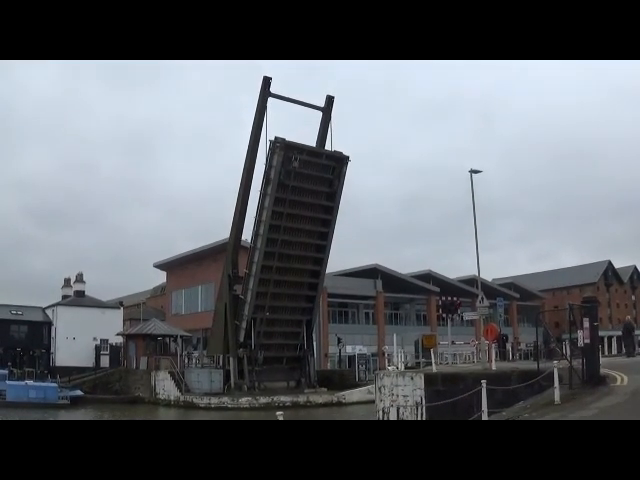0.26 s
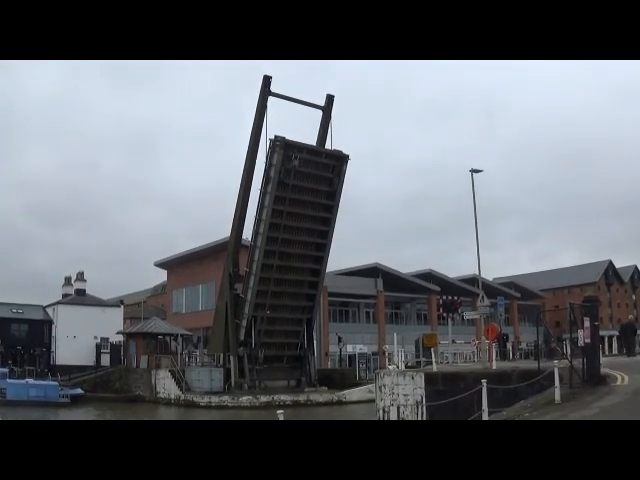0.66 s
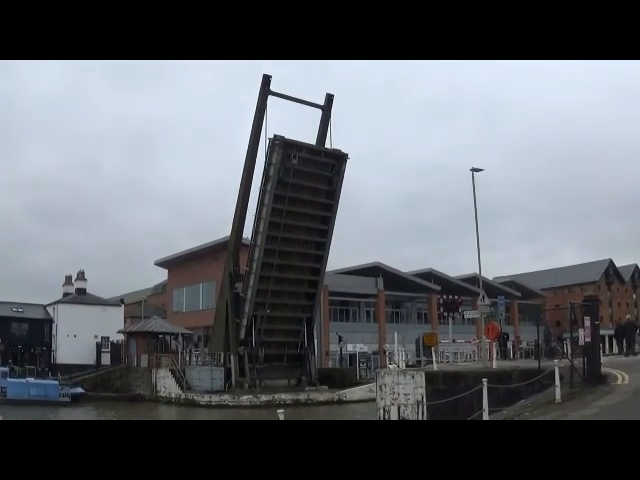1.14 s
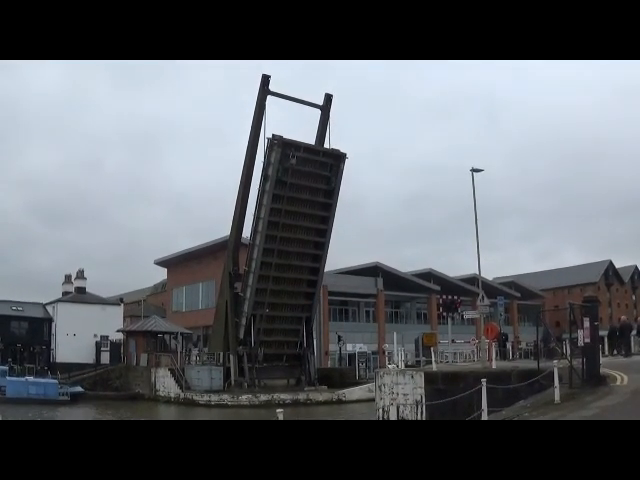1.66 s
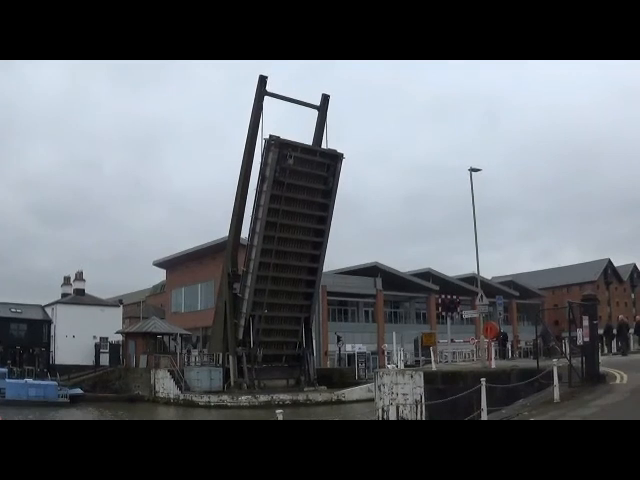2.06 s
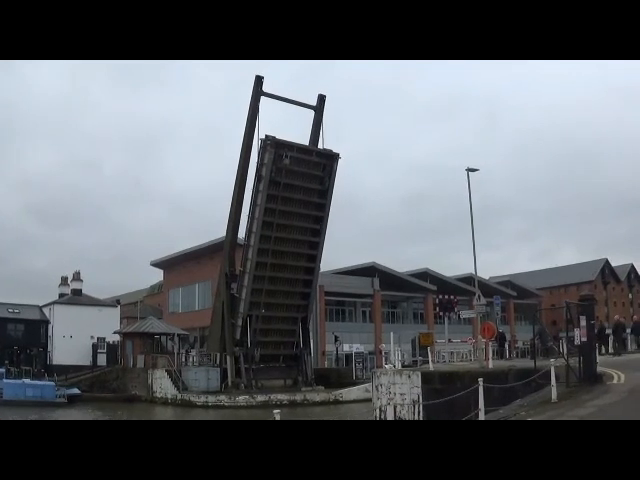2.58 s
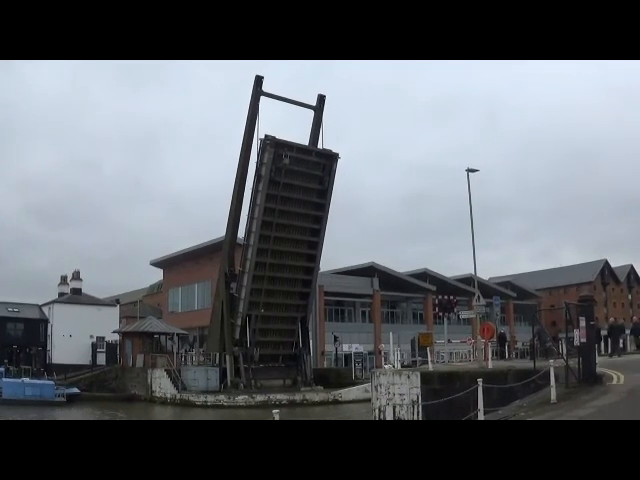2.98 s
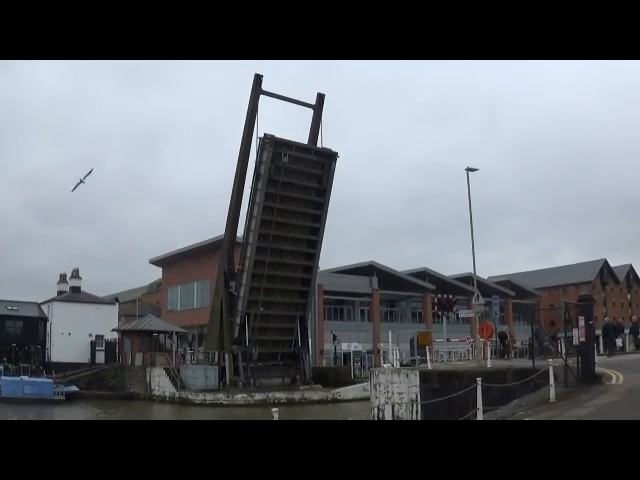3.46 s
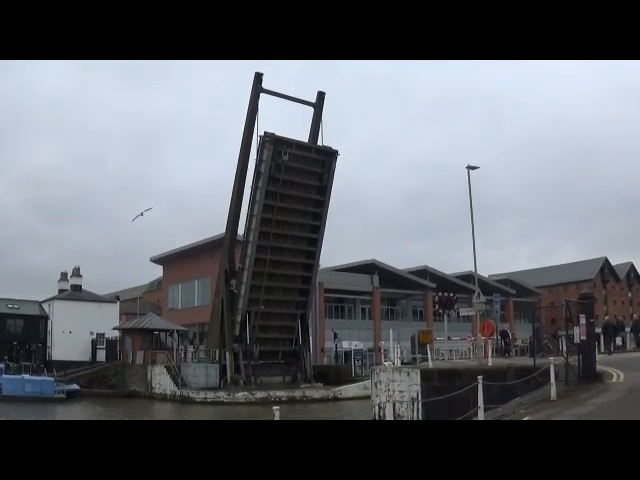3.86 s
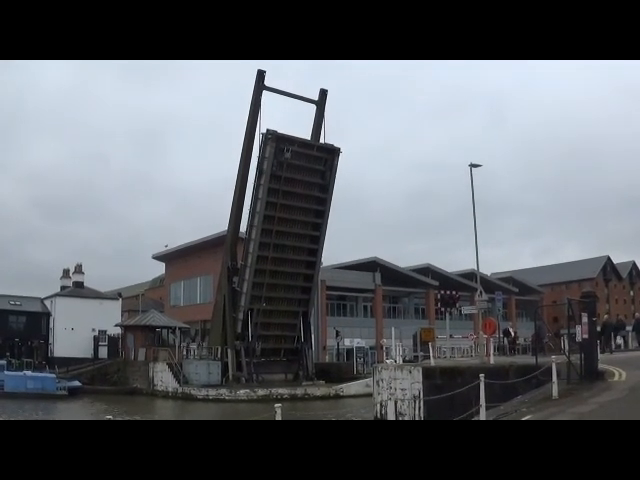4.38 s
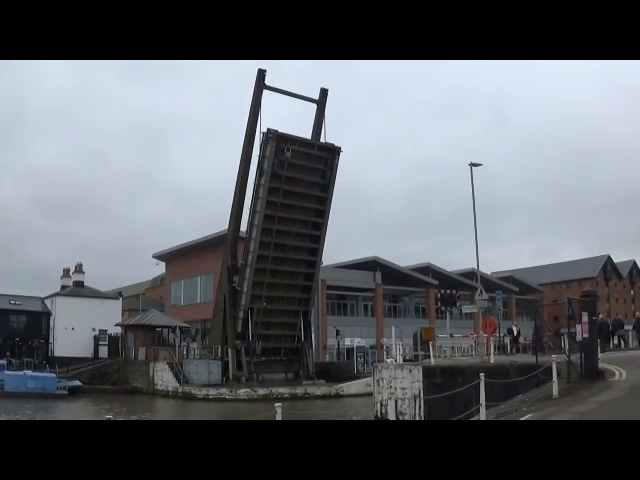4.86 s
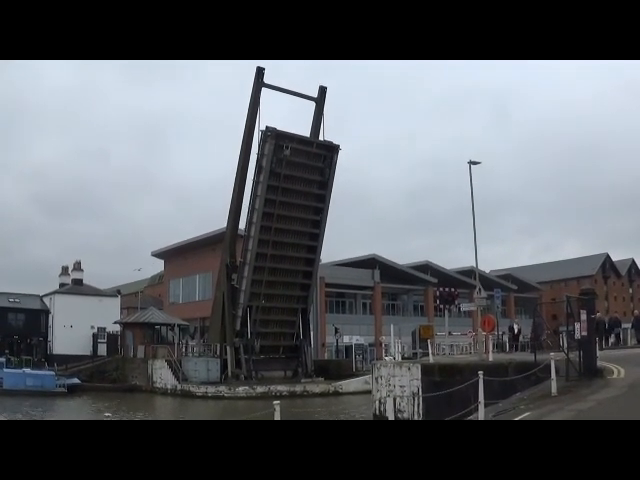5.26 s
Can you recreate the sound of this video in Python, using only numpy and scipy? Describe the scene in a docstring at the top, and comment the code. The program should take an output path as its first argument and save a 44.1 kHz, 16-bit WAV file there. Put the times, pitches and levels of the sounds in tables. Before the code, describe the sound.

A smooth machine hum dominates over four seconds, with hissing fluid ringing in pipes that gradually quietens. A faraway vehicle pulls off as a very low drone. A clattering steel clunk cuts the hum, followed by trembling, a short dry creak, then rough deep rumble, rattling plates and heavy thumps beneath a wavering brake squeal. Wide stereo pickup in an open waterside space, diffuse reflections from buildings, quiet traffic wash.

```python
"""Beside a dock a steel lifting bridge is raised; the hydraulic pump's periodic pulses sum to a hum and whine.
Oil is shaped noise: it hisses, rings in the pipes and whistles at a valve that closes as the deck slows.
The drive stops with a clunk, decaying bursts of noise that come back from the buildings as a diffuse tail.
The deck then shudders and rumbles, a pivot creaks, and a brake squeals on close, beating disc modes.
An engine idles and a vehicle pulls away some way off, as harmonic tones under the noise of the town."""
import sys
import numpy as np
from scipy import signal
from scipy.fft import rfft, irfft, next_fast_len
from scipy.io import wavfile

SR = 44100
rng = np.random.default_rng(int(sys.argv[2]) if len(sys.argv) > 2 else 0)


def wrap_up_sound(samples):
    """Save the sound to the file named by the first command line argument, as 16-bit audio."""
    columns = np.atleast_2d(samples).T
    # keep every value between -1 and 1, then stretch to whole-number steps
    tamed = np.clip(columns, -1, 1)
    steps = np.round(tamed * 32767).astype(np.int16)
    wavfile.write(sys.argv[1], SR, steps)


N = 243852
T = np.arange(N) / SR  # time in seconds

# Levels within a spectrum or a set of modes are relative.
# A mode's width is the offset from its centre at which the amplitude is a third of the peak.

# Harmonics of the pump's hum. Each row: multiple of the piston rate, level in dB.
HUM_HARMONICS = [(1 / 2, -24.5), (1, 0), (3 / 2, -26), (2, -24.5), (5 / 2, -32)]
# Harmonics of the pump's whine. Each row: multiple of the piston rate, relative level in dB.
WHINE_HARMONICS = [(9, -11), (10, 0), (11, -10), (14, -10)]
# Spectrum of the oil's turbulent hiss. Each row: frequency in Hz, level in dB.
OIL_SPECTRUM = [(900, -3), (2200, -5.5), (3400, -5.5), (4000, -13), (4900, -13.5), (6400, -14),
                (7600, -11.5), (9000, -16), (11000, -18)]
# Modes the oil rings in the pipes. Each row: centre in Hz, width in Hz, level in dB.
PIPE_MODES = [(1210, 46, 3), (1846, 82, 3.5), (2300, 120, -2), (3147, 260, -2), (4230, 135, -6.5)]
# The valve's whistling band. Each row: centre in Hz, width in Hz, level in dB.
VALVE_MODES = [(9770, 370, 0)]
# Blows in the drive. Each row: start in seconds, clash in dB, ring in dB, thud in dB.
DRIVE_BLOWS = [(4.191, -23, -26, -21), (4.271, -30.5, -32, -19), (4.327, -39, -44, -30)]
# Spectrum of the clashing faces. Each row: frequency in Hz, level in dB.
CLASH_SPECTRUM = [(300, -1.5), (450, 6), (850, -26), (1300, -4), (2300, -6), (3500, -13), (6000, -19),
                  (8000, -17), (11000, -20)]
# Spectrum of the girders' thud. Each row: frequency in Hz, level in dB.
THUD_SPECTRUM = [(40, -34), (90, -11), (140, -2), (175, -16.5), (235, -11.5), (310, -19.5), (400, -20.5),
                 (800, -27.5)]
# Modes of the struck steel. Each row: centre in Hz, width in Hz, level in dB.
STEEL_MODES = [(621, 11.5, 17.5), (1026, 42, 5.5), (1257, 31, 1), (1800, 96, 0), (2230, 120, -6),
               (2860, 60, -4), (3050, 60, 2.5), (9960, 210, 3.5), (10120, 100, -6), (10670, 150, -5)]
# The band of the pawl's click. Each row: centre in Hz, width in Hz, level in dB.
PAWL_MODES = [(2230, 650, 0)]
# Slips of the dry pivot as it takes the load. Each row: start in seconds, level in dB.
PIVOT_SLIPS = [(4.668, -34.5), (4.693, -40.5), (4.747, -45)]
# Modes of the pivot's pin. Each row: centre in Hz, width in Hz, level in dB.
PIN_MODES = [(1370, 35, -5), (1497, 61, -0.5), (2100, 300, -18), (2920, 200, -20), (5540, 93, -19.5),
             (6950, 700, -37)]
# Spectrum of the deck's rumble. Each row: frequency in Hz, level in dB.
RUMBLE_SPECTRUM = [(22, -17), (36, -7), (62, -7), (100, 0.5), (155, 0.5), (215, -2), (270, -6),
                   (350, -10.5), (500, -20), (720, -29.5)]
# Spectrum of the deck plates' rattle. Each row: frequency in Hz, level in dB.
RATTLE_SPECTRUM = [(260, -6), (460, 2), (780, -5), (1280, -8.5), (2100, -17.5), (3100, -33), (4600, -30.5),
                   (7200, -44), (10800, -45)]
# Heavy heaves of the deck. Each row: start in seconds, pitch in Hz, level in dB.
DECK_HEAVES = [(4.832, 88.7, -11.5), (4.926, 58.4, -16.5), (5.078, 79.4, -22), (5.263, 60.5, -12),
               (5.335, 149, -17)]
# Modes of the brake disc. Each row: pitch in Hz, waver in Hz, relative level in dB, time of peak in seconds.
DISC_MODES = [(1803, 5, 0, 4.93), (1846, 6, 0, 5.18), (1873, 10, -6, 5.07)]
# Overtones of the second disc mode. Each row: multiple of its pitch, relative level in dB.
SQUEAL_OVERTONES = [(2, 6), (3, -1), (5, 0)]
# Spectrum of the brake pad's scrape. Each row: frequency in Hz, level in dB.
SCRAPE_SPECTRUM = [(2000, -14), (3600, 7), (4400, -8), (7300, -1), (8300, -15), (9200, -2), (10500, -14)]
# The pad grabs once more as it lets go: time in seconds, half length in seconds, added pressure 0-1.
LAST_PAD_GRAB = (5.303, 0.02, 0.61)
# Reverberation among the buildings. Each row: frequency in Hz, time to decay by 60 dB in seconds.
QUAY_DECAY = [(100, 0.63), (500, 0.7), (2000, 1), (10000, 0.45)]
# Harmonics of the idling engine. Each row: multiple of the firing rate, level in dB, gain in a swell in dB.
ENGINE_HARMONICS = [(1, -57, -4), (2, -49.5, 5), (3, -43.5, 7.5)]
# Swells of the engine's throb. Each row: centre in seconds, half length in seconds, strength 0-1.
ENGINE_SWELLS = [(2.27, 0.52, 1), (3.868, 0.23, 0.95)]
# Spectrum of the town's wash. Each row: frequency in Hz, level in dB.
WASH_SPECTRUM = [(240, -10), (330, -2), (500, -3), (1050, -3.5), (1500, -10), (2200, -14), (3300, -21),
                 (4600, -28)]
# Spectrum of the town's low rumble. Each row: frequency in Hz, level in dB.
TOWN_LOW_SPECTRUM = [(18, -21), (46, -7), (86, -1.5), (142, 0), (212, -3.5), (295, -6.5), (440, -19.5)]
# Left-right correlation of broad noise. Each row: frequency in Hz, correlation from -1 to 1.
CORRELATION = [(60, 0.95), (150, 0.85), (330, 0.72), (700, 0.68), (1100, 0.54), (2000, 0.72), (5000, 0.62),
               (10000, 0.89)]
# Left-right correlation of the deck's noise. Each row: frequency in Hz, correlation from -1 to 1.
DECK_CORRELATION = [(60, 0.66), (110, .5), (190, 0.55), (330, -0.21), (600, 0.11), (1100, .2), (2000, 0.56)]

# the valve starts to close, takes this long over it, and the drive stops
THROTTLE_S, CLOSING_S, STOP_S = 2.21, 1.14, 4.186
PISTON_HZ = 223.3
# the hum sags once the valve starts to close; hum and whine weaken further just before the stop
HUM_DB, HUM_SAG_DB_PER_S, RUN_DOWN_S, RUN_DOWN_DB = -26, 2.5, 0.2, 4.5
# the whine comes up as the load shifts, then sags
WHINE_DB, WHINE_RISE_DB, WHINE_SAG_DB_PER_S, LOAD_S, LOAD_RISE_S = -60.5, 6, 1, 1.8, 0.22
# the hiss with the valve open, its loss on closing, and the pipes' ring relative to it
HISS_DB, HISS_DROP_DB, PIPES_DB = -49.5, 9.5, -2.5
# the whistle grows slowly, then collapses as the valve closes
WHISTLE_DB, WHISTLE_GROWS_DB_PER_S, WHISTLE_DROP_DB, WHISTLE_COLLAPSE_S = -54.5, 1, 26, 0.41
# the deck trembles after the clunk, then breaks into a full shudder
TREMBLE_S, TREMBLE_DB, SHUDDER_S, SHUDDER_ATTACK_S = 4.37, -10.5, 4.68, 0.077
RUMBLE_DB = -22.5
# the rattle takes this share of the shudder's change in dB, holds, then settles
RATTLE_DB, RATTLE_FOLLOWS, RATTLE_HOLD_S, RATTLE_SETTLE_DB_PER_S = -37.5, 0.57, 0.47, 15
# each heave jolts the rumble and the plates
JOLT_DB, JOLT_S = 3, 0.027
# the brake pad touches, presses harder, holds and lets go
BRAKE_S, PRESS_S, GRIP_S, LET_GO_S = 4.75, 0.23, 0.22, 0.17
# squeal and harshness at full pressure, and how much weaker each is at the first touch
SQUEAL_DB, SQUEAL_RANGE_DB, HARSH_DB, HARSH_RANGE_DB = -37, 11.5, -59, 33
IDLE_HZ = 35.6  # the idling engine's firing rate
# the far vehicle speeds up evenly, comes in quickly and recedes
PULL_AWAY_S, SPEED_UP_S, DRONE_FROM_HZ, DRONE_TO_HZ = 3.4, 0.78, 36.9, 42.5
DRONE_DB, DRONE_START_S, DRONE_ATTACK_S, RECEDE_DB_PER_S = -41.5, 2.98, 0.57, 6
TOWN_DB, TOWN_LOW_DB = -43.5, -43.5
TOP_HZ = 11080  # upper band limit of the whole sound


def amp(db):
    """The level law: decibels to an amplitude ratio."""
    return np.exp(np.asarray(db) * np.log(10) / 20)


def unit(x):
    """Normalisation to an rms of 1."""
    return x / np.sqrt(np.mean(x ** 2) + 1e-20)


def along(points, hz):
    """Linear interpolation of (Hz, value) points on a logarithmic frequency axis."""
    f, v = np.transpose(points)
    return np.interp(np.log(hz + 1), np.log(f + 1), v)


def since(start):
    """Elapsed time: seconds since start, 0 before it."""
    return np.maximum(T - start, 0)


def fade_in(start, length):
    """A linear ramp from 0 to 1."""
    return np.clip((T - start) / length, 0, 1)


def swell(centre, half_length):
    """A Gaussian bump from 0 to 1 and back."""
    return np.exp(-((T - centre) / half_length) ** 2)


def struck(start, attack, t60):
    """The envelope of one blow: a quick rise under an exponential decay."""
    age = since(start)
    return (1 - np.exp(-age / attack)) * amp(-60 * age / t60)


def wobble(rate, order=6):
    """Band-limited random fluctuation: a smooth curve through rate knots a second."""
    knots = rng.standard_normal(int(N * rate / SR) + 4)
    smooth = signal.resample(knots, len(knots) * order)
    return np.interp(T * rate * order, np.arange(len(smooth)), smooth)


def cycles(hz):
    """Phase as the integral of frequency, from a random start."""
    return 2 * np.pi * (np.cumsum(hz) / SR + rng.random())


def pan(x, left_db):
    """Level difference between the ears: louder on the left by left_db."""
    return x * amp([[left_db / 2], [-left_db / 2]])


def filtered(x, response):
    """Linear filtering: the spectrum of x times a response of frequency."""
    m = next_fast_len(N + SR // 2)
    return irfft(rfft(x, m) * response(np.fft.rfftfreq(m, 1 / SR)), m)[..., :N]


def colour(points):
    """The gain of a broad spectrum, falling as the square of frequency beyond its ends."""
    def gain(hz):
        below = np.minimum(hz / points[0][0], 1) ** 2
        above = np.maximum(hz / points[-1][0], 1) ** 2
        return amp(along(points, hz)) * below / above
    return gain


def resonances(modes):
    """Superposition of resonance peaks, each with a Lorentzian gain."""
    return lambda hz: sum(amp(db) / (1 + ((hz - centre) / width) ** 2 * 2) for centre, width, db in modes)


def rush(gain, correlation=CORRELATION):
    """Coloured noise of rms 1; the balance of mid to side sets the left-right correlation."""
    def mid_and_side(hz):
        turn = np.arccos(np.clip(along(correlation, hz), -1, 1)) / 2
        return gain(hz) * [np.cos(turn), np.sin(turn)]
    mid, side = filtered(rng.standard_normal((2, N)), mid_and_side)
    return unit(np.array([mid + side, mid - side]))


def pump():
    """Periodic pulsation: pistons pulse the oil at a steady rate, giving harmonics that waver in the open air."""
    run_down_db = RUN_DOWN_DB * fade_in(STOP_S - RUN_DOWN_S, RUN_DOWN_S)
    hum_db = HUM_DB - HUM_SAG_DB_PER_S * since(THROTTLE_S) - run_down_db
    whine_db = WHINE_DB + WHINE_RISE_DB * fade_in(LOAD_S, LOAD_RISE_S)
    whine_db = whine_db - WHINE_SAG_DB_PER_S * since(THROTTLE_S) - run_down_db
    phase = cycles(PISTON_HZ + 0.21 * wobble(12))
    hum = 0
    for k, db in HUM_HARMONICS:
        waver_db = (k != 1) * 2.0 * wobble(5.06)  # the fundamental stays steady
        hum = hum + amp(db + waver_db) * np.sin(k * phase + 2 * np.pi * rng.random())
    whine = sum(amp(db + 1.1 * wobble(14)) * np.sin(k * phase) for k, db in WHINE_HARMONICS)
    left_db = 4.1 - 0.3 * T  # the hum drifts towards the centre
    sides_db = np.array([left_db, -left_db]) / 2
    stereo_hum = amp(hum_db + 0.67 * wobble(5.95) + sides_db) * hum
    running = 1 - fade_in(STOP_S - 0.06, 0.13)
    return running * (stereo_hum + pan(amp(whine_db) * whine, left_db=4))


def oil():
    """Flow noise: oil hisses, excites the pipes, whistles at the valve and spits as the pressure is dumped."""
    hiss_db = HISS_DB - HISS_DROP_DB * fade_in(THROTTLE_S, CLOSING_S)
    collapse = 1 - np.exp(-since(THROTTLE_S) / WHISTLE_COLLAPSE_S)
    whistle_db = WHISTLE_DB + WHISTLE_GROWS_DB_PER_S * np.minimum(T, THROTTLE_S) - WHISTLE_DROP_DB * collapse
    hiss = amp(hiss_db + 0.57 * wobble(10)) * rush(colour(OIL_SPECTRUM))
    pipes = amp(hiss_db + PIPES_DB + 0.74 * wobble(6.28)) * rush(resonances(PIPE_MODES))
    whistle = amp(whistle_db + 1.0 * wobble(20)) * rush(resonances(VALVE_MODES))
    spit = amp(-48.5) * struck(4.325, attack=0.0036, t60=0.44) * rush(resonances(VALVE_MODES))
    after_stop = 1 - 0.32 * fade_in(STOP_S, 0.81)
    return (hiss + pipes + whistle) * after_stop + spit


def clunk():
    """Impact: a pawl clicks; each blow clashes chattering faces, rings the steel and, slower, booms the girders."""
    click = amp(-28.0) * struck(4.186, attack=0.0011, t60=0.1) * rush(resonances(PAWL_MODES))
    clash_power, ring_power, thud_power = np.zeros((3, N))  # the blows add as power
    for s, clash_db, ring_db, thud_db in DRIVE_BLOWS:
        clash_power += (amp(clash_db) * struck(s, attack=0.005, t60=0.25)) ** 2
        ring_power += (amp(ring_db) * struck(s, attack=0.004, t60=0.24)) ** 2
        thud_power += (amp(thud_db) * struck(s, attack=0.022, t60=0.67)) ** 2
    chatter = amp(2.2 * wobble(250))
    clash = chatter * np.sqrt(clash_power) * rush(colour(CLASH_SPECTRUM))
    ring = np.sqrt(ring_power) * rush(resonances(STEEL_MODES))
    thud = np.sqrt(thud_power) * rush(colour(THUD_SPECTRUM))
    return click + clash + ring + thud


def deck():
    """Structural vibration: the halted deck rumbles, its plates rattle and settle, and deep heaves jolt both."""
    jolts = sum(swell(s + JOLT_S, JOLT_S) for s, hz, db in DECK_HEAVES)
    shake_db = TREMBLE_DB * (1 - fade_in(SHUDDER_S, SHUDDER_ATTACK_S)) + JOLT_DB * jolts
    rumble_db = RUMBLE_DB + shake_db
    settle_db = RATTLE_SETTLE_DB_PER_S * since(SHUDDER_S + RATTLE_HOLD_S)
    rattle_db = RATTLE_DB + RATTLE_FOLLOWS * shake_db - settle_db
    judder = wobble(45)  # one roughness shared by both
    rumble = amp(rumble_db + 1.55 * judder) * rush(colour(RUMBLE_SPECTRUM), DECK_CORRELATION)
    rattle = amp(rattle_db + 1.75 * judder) * rush(colour(RATTLE_SPECTRUM), DECK_CORRELATION)
    heaves = 0
    for s, hz, db in DECK_HEAVES:
        heaves = heaves + amp(db) * struck(s, attack=0.012, t60=0.2) * np.sin(2 * np.pi * hz * (T - s))
    return fade_in(TREMBLE_S, 0.083) * (rumble + rattle) + heaves


def brake():
    """Friction-driven vibration: close disc modes beat; greater pressure brings out overtones and a scrape."""
    release_s = BRAKE_S + PRESS_S + GRIP_S
    grab_s, grab_half_length, grab = LAST_PAD_GRAB
    pressure = fade_in(BRAKE_S, PRESS_S) - fade_in(release_s, LET_GO_S) + grab * swell(grab_s, grab_half_length)
    squeal_db = SQUEAL_DB - SQUEAL_RANGE_DB * (1 - pressure)
    harsh_db = HARSH_DB - HARSH_RANGE_DB * (1 - pressure)
    phases = [cycles(hz + waver * wobble(70)) for hz, waver, db, s in DISC_MODES]
    # the squeal passes from mode to mode as their shares change
    shares = np.array([amp(db) / (1 + ((T - s) / 0.25) ** 2) for hz, waver, db, s in DISC_MODES])
    modes = np.sum(shares * np.sin(phases), axis=0) / np.linalg.norm(shares, axis=0)
    squeal = amp(squeal_db) * modes
    flutter = amp(1.4 * wobble(80))
    rough_phase = phases[1] + 0.14 * wobble(300)
    overtones = 0
    for k, db in SQUEAL_OVERTONES:
        overtones = overtones + amp(harsh_db + db + 3.5 * wobble(70)) * np.sin(k * rough_phase)
    scrape = amp(harsh_db + 5) * rush(colour(SCRAPE_SPECTRUM))
    touching = fade_in(BRAKE_S, 0.04) * (1 - fade_in(release_s, 0.22))
    return touching * (flutter * (squeal + overtones) + scrape)


def pivot():
    """Stick and slip: the dry pivot slips a few times, and its pin rings."""
    slips = sum(amp(db) * struck(s, attack=0.003, t60=0.16) for s, db in PIVOT_SLIPS)
    return slips * rush(resonances(PIN_MODES))


def quay(x):
    """Reverberation: the buildings answer with a diffuse tail whose decay time depends on frequency."""
    hz, t, z = signal.stft(rng.standard_normal((2, SR)), SR, nperseg=256)
    decay = amp(-60 * t / along(QUAY_DECAY, hz)[:, None])
    tail = signal.istft(z * decay, SR, nperseg=256)[1]
    return signal.fftconvolve(x, tail / np.linalg.norm(tail[0]), axes=1)[:, :N]


def engine():
    """Periodic combustion: low harmonics of the firing rate throb a little unevenly and change in the swells."""
    phase = cycles(IDLE_HZ + 0.2 * wobble(4.92))
    throb = sum(strength * swell(s, half_length) for s, half_length, strength in ENGINE_SWELLS)
    idle = 0
    for k, db, swell_db in ENGINE_HARMONICS:
        idle = idle + amp(db + swell_db * throb + 2.2 * wobble(6.04)) * np.sin(k * phase)
    return pan(idle, left_db=0.9)


def vehicle():
    """Pitch follows engine speed: a far vehicle's drone rises as it gathers speed, then weakens as it recedes."""
    hz = DRONE_FROM_HZ + (DRONE_TO_HZ - DRONE_FROM_HZ) * fade_in(PULL_AWAY_S, SPEED_UP_S)
    drone_db = DRONE_DB - RECEDE_DB_PER_S * since(PULL_AWAY_S + SPEED_UP_S)
    level = amp(drone_db) * fade_in(DRONE_START_S, DRONE_ATTACK_S)
    return pan(level * np.sin(cycles(hz)), left_db=3.0)


def town():
    """Far traffic merges into noise: a wash over a low rumble."""
    wash = amp(TOWN_DB + 0.8 * wobble(6.6)) * rush(colour(WASH_SPECTRUM))
    low = amp(TOWN_LOW_DB + 0.5 * wobble(4.35)) * rush(colour(TOWN_LOW_SPECTRUM))
    return pan(wash + low, left_db=1.7)


def scene():
    """Superposition of all sources; the clunk, pivot and brake are also heard by reverberation."""
    stop = clunk() + pivot() + brake()
    echo = amp(-12.5) * quay(stop)
    return pump() + oil() + stop + deck() + echo + engine() + vehicle() + town()


def record(dry):
    """Band limitation: short fades at both ends, then a low-pass with a narrow transition at TOP_HZ."""
    ends = np.clip(np.minimum(T, T[-1] - T) / 0.004, 0, 1)
    return filtered(ends * dry, lambda hz: np.clip((TOP_HZ - hz) / 60 + 0.5, 0, 1))


dry = scene()
out = record(dry)
wrap_up_sound(out)
```